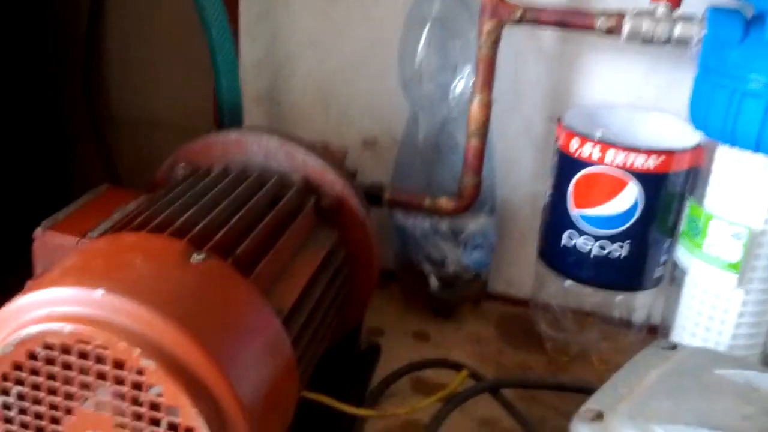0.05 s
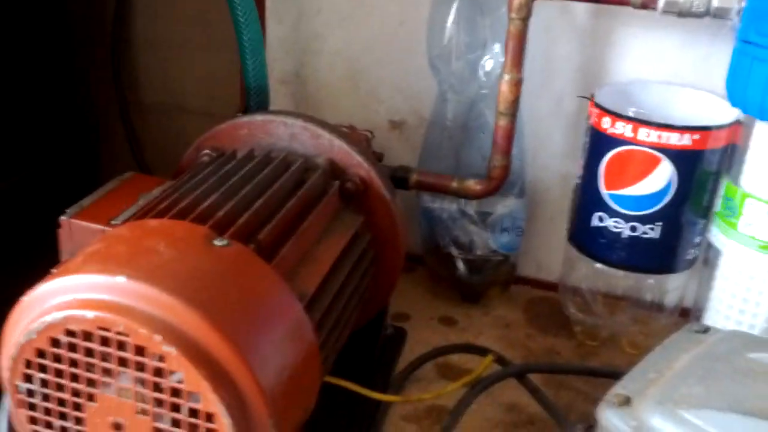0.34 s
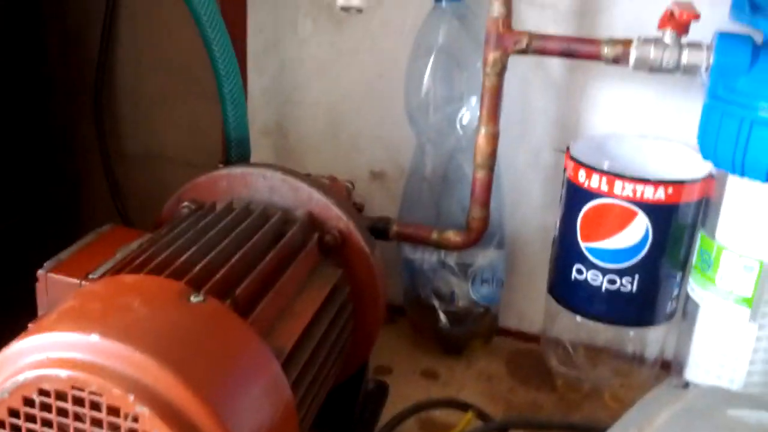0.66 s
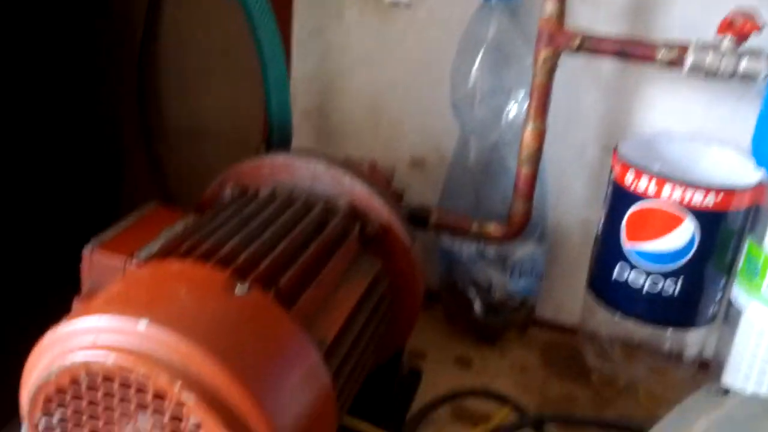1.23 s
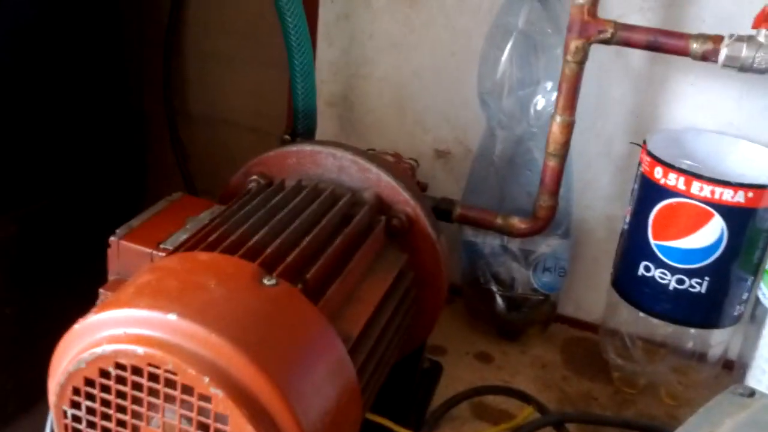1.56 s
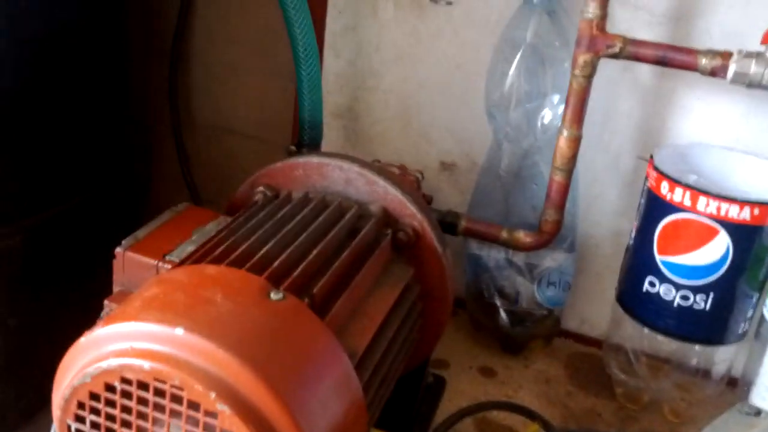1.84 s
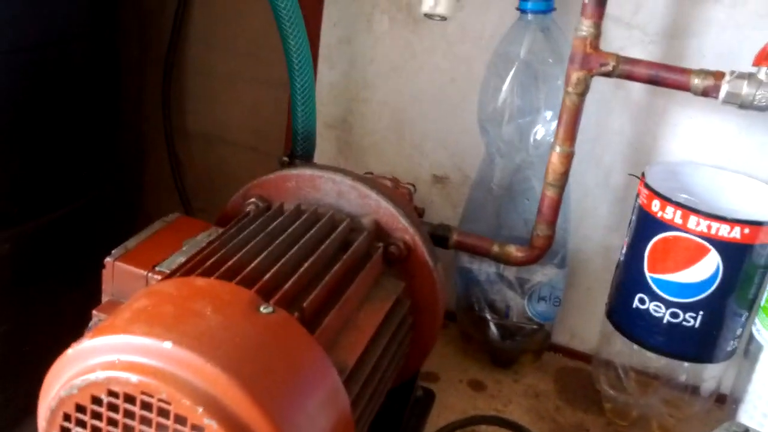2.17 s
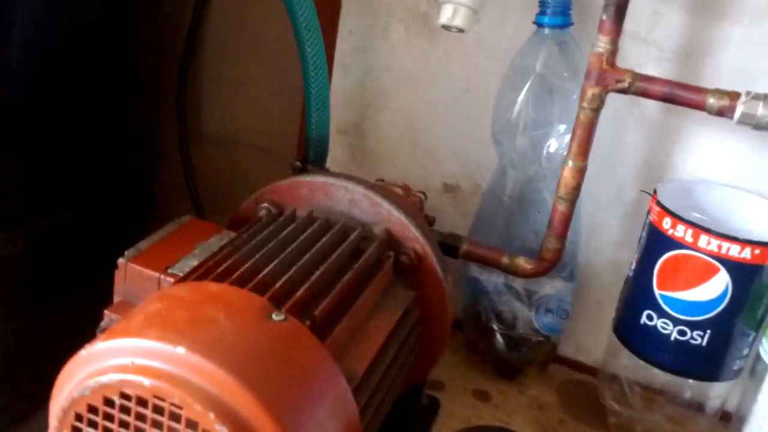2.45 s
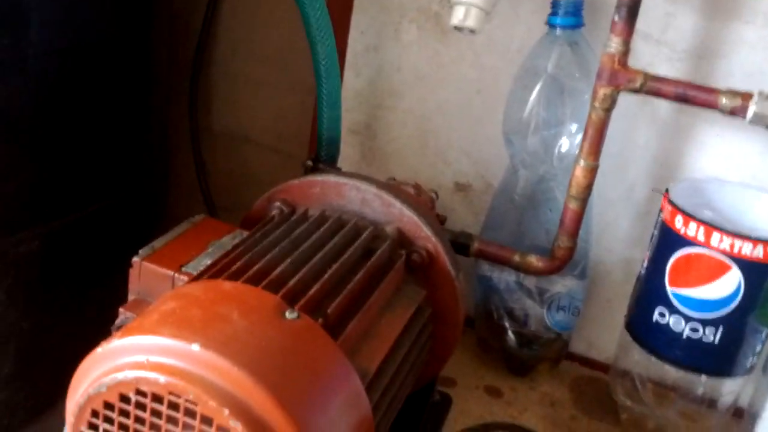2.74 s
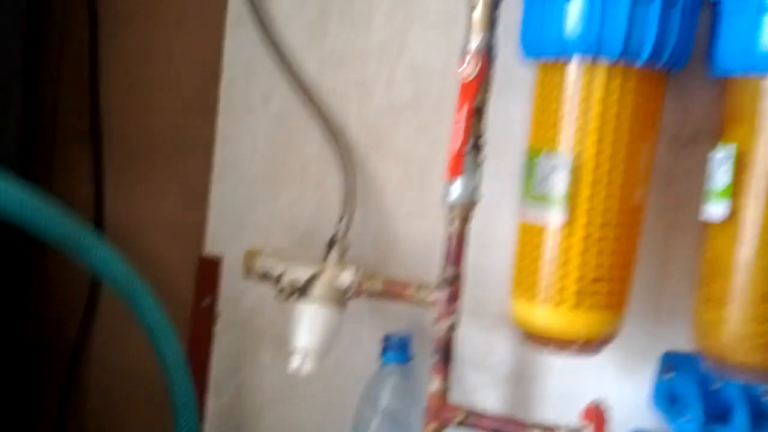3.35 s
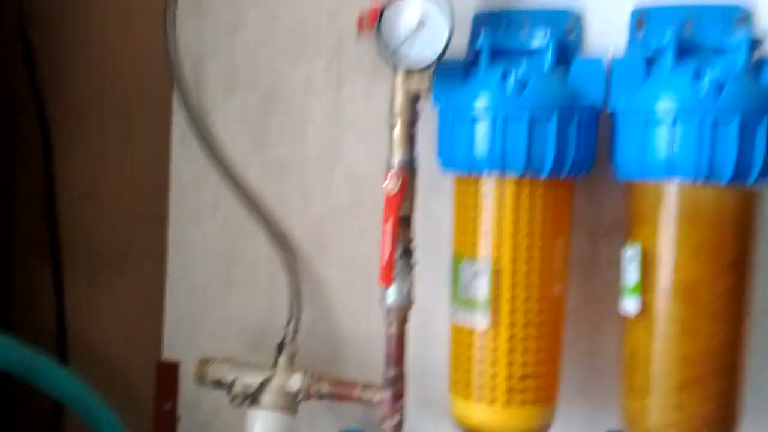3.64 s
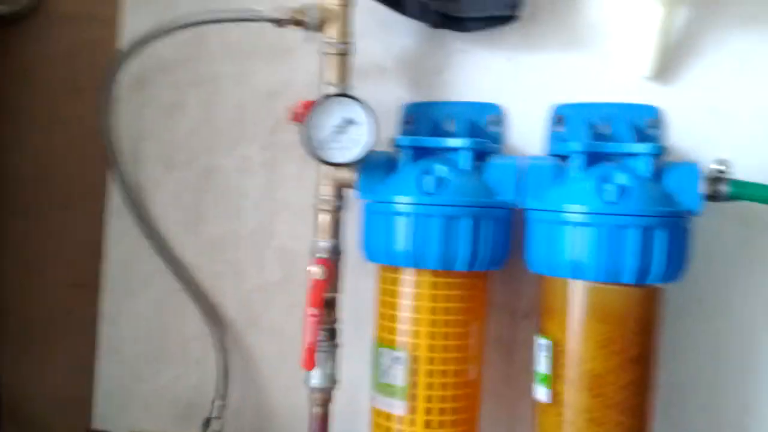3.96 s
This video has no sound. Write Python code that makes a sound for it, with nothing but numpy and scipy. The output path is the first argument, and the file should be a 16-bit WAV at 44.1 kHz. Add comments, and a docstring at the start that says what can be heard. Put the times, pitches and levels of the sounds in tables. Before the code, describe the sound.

An electric motor starts with a clunk and runs with a steady grinding hum.

```python
"""A small utility room, where a four-pole electric motor drives a water pump near a hand-held microphone. After
faint handling knocks, the contactor clicks and the starting torque jolts the frame into ringing. The magnetic
field hums at twice the mains frequency, the pump impeller's vanes whine at multiples of the shaft speed, and
seal and bearing rub once a turn over a steady grinding and hiss. A second after the start the pipework gives a
dull thump; then the microphone turns away and the timbre shifts."""
import sys
import numpy as np
from scipy import signal
from scipy.fft import rfft, irfft
from scipy.io import wavfile
from scipy.ndimage import uniform_filter1d, map_coordinates

SR = 44100
rng = np.random.default_rng(int(sys.argv[2]) if len(sys.argv) > 2 else 0)


def wav_record(signal):
    """Record a signal, one row per channel, as 16-bit PCM in the file named by sys.argv[1]."""
    frames = np.transpose(np.atleast_2d(signal))
    bounded = np.clip(frames, -1, 1)
    # unit amplitude maps onto the largest positive 16-bit level
    quanta = np.round(bounded * 32767).astype(np.int16)
    wavfile.write(sys.argv[1], SR, quanta)


N = 176400
TIME_S, FREQ_HZ = np.arange(N) / SR, np.arange(N // 2 + 1) * SR / N
MAINS_HZ, SHAFT_HZ, POWER_ON_S = 50, 24.945, 1.545


def gain(db):
    """Amplitude ratio: tenfold for every 20 dB."""
    return 10 ** (np.asarray(db) / 20)


def noise():
    """White Gaussian noise: equal power at all frequencies."""
    return rng.standard_normal(N)


def colour(x, spectrum):
    """Spectral shaping by (frequency_hz, level_db) points, with steep skirts; rms 1."""
    hz, db = np.array(spectrum).T
    log_f = np.log(np.maximum(FREQ_HZ, 1))
    outside = np.abs(log_f - np.clip(log_f, np.log(hz[0]), np.log(hz[-1])))
    shaped = irfft(rfft(x) * gain(np.interp(log_f, np.log(hz), db) - 220 * outside), N)
    return shaped / np.std(shaped)


def band(x, centre_hz, width_hz):
    """Resonance with a Lorentzian amplitude response; rms 1."""
    shaped = irfft(rfft(x) / (1 + (2 * (FREQ_HZ - centre_hz) / width_hz) ** 2), N)
    return shaped / np.std(shaped)


def drift(rate_hz):
    """Smoothed random fluctuation with a spread near 1."""
    hold = int(SR / rate_hz)
    steps = np.repeat(rng.standard_normal(N // hold + 1), hold)
    return 1.44 * uniform_filter1d(uniform_filter1d(steps, hold), hold)[:N]


def burst(age, attack_s, decay_s, hold_s=0):
    """Transient envelope: linear rise, optional hold, exponential decay."""
    return np.clip(age / attack_s, 0, 1) * np.exp(-np.maximum(age - attack_s - hold_s, 0) / decay_s)


def ring(start_s, modes, contact_s):
    """Free vibration: damped modes build up over the contact time of a blow."""
    age = np.maximum(TIME_S - start_s, 0)
    ringing = sum(gain(db - 60 * age / t60) * np.sin(2 * np.pi * hz * age) for hz, db, t60 in modes)
    return np.minimum(age / contact_s, 1) * ringing


def reverberate(x, t60_s=.45, tail_db=-8):
    """Reverberation: reflections from bare walls add a diffuse, decaying tail."""
    t = TIME_S[:SR // 2]
    tail = rng.standard_normal(len(t)) * gain(-60 * t / t60_s) * (t > .005)
    return x + gain(tail_db) * signal.fftconvolve(x, tail / np.linalg.norm(tail))[:N]


# Ambient noise spectrum: frequency_hz, relative_db
AMBIENT_SPECTRUM = [(12, -37), (20, 3), (66, -14.5), (153, -16.5), (232, -11.5), (633, -21), (1780, -23),
                    (2410, -22), (2700, -24), (3460, -23.5), (3770, -21.5), (4580, -23.5), (12100, -22),
                    (13600, -17), (15600, -13)]
# Electrical buzz bands: centre_hz, width_hz, level_db
BUZZ_BANDS = [(2383, 550, -63.5), (6480, 58, -74), (11100, 770, -69), (13750, 950, -59.5)]

def background():
    """Amplitude modulation at the mains frequency pulses a flickering buzz, over rumble and hiss."""
    pulse = burst(TIME_S % (1 / MAINS_HZ), .0016, .015) + .8
    periodic = np.resize(rng.standard_normal(SR // MAINS_HZ), N)
    buzz = sum(gain(db + drift(69.8)) * band((periodic + noise()) * pulse, hz, width)
               for hz, width, db in BUZZ_BANDS)
    ambient = gain(-57.5) * colour(noise(), AMBIENT_SPECTRUM)
    rumble = gain(-56) * band(noise(), 44, 60)
    return buzz + ambient + rumble


# Handling knocks: start_s, thud_db, tick_db
KNOCKS = [(.029, -45, -52), (.072, -62, -52), (.259, -46, -47), (.267, -56, -57), (.443, -66, -48)]
# Spectra of a knock's thud and tick: frequency_hz, relative_db
THUD_SPECTRUM = [(150, -7), (350, 4.5), (500, -1), (650, 6), (850, -9), (1100, -18), (1600, -14),
                 (3000, -21)]
TICK_SPECTRUM = [(900, -17), (1400, 3), (2500, -5), (5000, -10), (9000, -5), (15000, 1)]
# Brushes of the hand: start_s, centre_hz, level_db, decay_s
BRUSHES = [(.005, 5000, -61.5, 0.13), (.25, 6460, -65, 0.22), (.28, 108, -59, 0.3),
           (.485, 300, -55.5, 0.06), (.63, 6000, -58.5, 0.068), (1.135, 2850, -62, 0.13)]

def handling():
    """Structure-borne sound: the hand knocks and brushes faintly on the microphone."""
    thuds = sum(gain(db) * burst(TIME_S - at, .0017, .032) for at, db, _ in KNOCKS)
    ticks = sum(gain(db) * burst(TIME_S - at, .003, .0072) for at, _, db in KNOCKS)
    brushes = sum(gain(db) * burst(TIME_S - at, .0062, decay) * band(noise(), hz, .5 * hz)
                  for at, hz, db, decay in BRUSHES)
    return thuds * colour(noise(), THUD_SPECTRUM) + ticks * colour(noise(), TICK_SPECTRUM) + brushes


# Blows at switch-on: start_s, ring_db, rattle_db
BLOWS = [(1.508, -54.5, -58), (1.533, -31, -44), (1.545, -23, -25), (1.556, -27, -25),
         (1.5618, -8.5, -21.5), (1.5727, -13.5, -34)]
# Modes of the frame and pipework: pitch_hz, relative_db, t60_s
FRAME_MODES = [(162.5, -16, 0.64), (229, -7, 0.17), (338, -22, 0.26), (428.2, -6.5, 0.23), (568, -8, 0.1),
               (624, -1.5, 0.039), (671, -9, 0.073), (780, -14, 0.17), (896, -4.5, 0.15), (1510, -13, .12),
               (1823, -19.5, 0.14)]
# Spectra of the rattle and the mounting's shudder: frequency_hz, relative_db
RATTLE_SPECTRUM = [(150, 6), (250, 4), (700, 2.5), (1000, 6), (1250, -37), (1600, -5), (3500, -6),
                   (5000, -14), (9000, -18), (15000, -25)]
SHUDDER_SPECTRUM = [(25, -8), (60, -15), (110, -10), (165, -1), (188, -12), (235, -10), (350, -6),
                    (500, -28), (900, -18)]

def starting_jolt():
    """Impulse excitation: the contactor's clicks and the starting torque ring and rattle the frame and shake
    its mounting."""
    ringing = sum(gain(db) * ring(at, FRAME_MODES, contact_s=.0011) for at, db, _ in BLOWS)
    ringing = signal.sosfilt(signal.butter(2, 110, "high", fs=SR, output="sos"), ringing)
    rattle = sum(gain(db) * burst(TIME_S - at, .00084, .016) for at, _, db in BLOWS)
    rattle *= colour(noise(), RATTLE_SPECTRUM)
    shudder = gain(-29.5) * burst(TIME_S - POWER_ON_S, .053, .14) * colour(noise(), SHUDDER_SPECTRUM)
    return reverberate(ringing + rattle) + shudder


# Hum orders (of the mains) and whine orders (of the shaft: 36 impeller vanes, sidebands, harmonics)
HUM_ORDERS, WHINE_ORDERS = (2, 12, 14), (35, 36, 37, 72, 108, 144)
# Tone levels along the microphone's path through standing waves: time_s, 3 x hum_db, 6 x whine_db
TONE_LEVELS = [(1.8, -38.5, -53, -58, -51, -48, -44, -54, -41, -50),
               (2.05, -36, -47, -57, -53, -42, -43, -56, -43, -51),
               (2.35, -36, -49, -57, -62, -37.5, -45, -55, -43, -50),
               (2.6, -34, -47, -47, -54, -39, -51, -51, -48, -46),
               (2.8, -32.5, -48, -47, -58, -35.5, -47, -50, -45, -45),
               (3.05, -33.5, -53, -48, -66, -41, -43, -46, -44, -44),
               (3.3, -32.5, -55, -48, -54, -47, -38, -53, -46, -43.5),
               (3.6, -34, -63, -60, -48, -45, -43, -69, -45, -47),
               (3.9, -33.5, -52, -51, -44, -42, -47, -75, -49, -53)]

def hum_and_whine(turns, throb_peak_s=3.652):
    """Magnetic forces hum; the vane-passing whine beats with its sidebands once a turn."""
    times, *levels = np.array(TONE_LEVELS).T
    rotor = turns - np.interp(throb_peak_s, TIME_S, turns)
    hum = [order * MAINS_HZ * TIME_S + rng.random() for order in HUM_ORDERS]
    whine = [order * rotor for order in WHINE_ORDERS]
    return sum(np.sqrt(2) * gain(np.interp(TIME_S, times, db) + .5 * drift(10)) * np.cos(2 * np.pi * c)
               for c, db in zip(hum + whine, levels))


# Weaker shaft harmonics at three microphone positions: order, first_db, second_db, third_db
SHAFT_HARMONICS = [(9, -52, -47, -44), (11, -56, -50, -51), (16, -56, -52, -53), (63, -56, -53, -53),
                   (73, -53, -54, -62), (80, -57, -64, -50), (81, -59, -58, -44.5), (99, -52, -52, -56),
                   (116, -50, -52, -56), (117, -48, -53, -56), (134, -51, -48, -65), (136, -54, -52, -53),
                   (140, -51, -53, -69), (143, -47, -51, -58), (162, -50, -53, -62), (163, -50, -52, -58),
                   (164, -51, -55, -60), (236, -55, -58, -65), (252, -56, -58, -65), (392, -56, -58, -58)]

def shaft_harmonics(turns, position_times_s=(2.1, 2.95, 3.75)):
    """Harmonic series of the rotation, each partial wavering in level on its own."""
    return sum(np.sqrt(2) * gain(np.interp(TIME_S, position_times_s, levels) + 2 * drift(1.98))
               * np.sin(2 * np.pi * (order * turns + rng.random())) for order, *levels in SHAFT_HARMONICS)


def roughness(turns, fresh_share, track_count=4):
    """Quasi-periodic noise: a slowly changing surface recurs each turn, mixed with fresh noise."""
    size = int(SR / SHAFT_HZ)
    tracks = rng.standard_normal((track_count, size))
    weights = np.array([drift(.99) for _ in tracks])
    weights /= np.linalg.norm(weights, axis=0)  # constant total power
    recurring = sum(weight * map_coordinates(track, [turns % 1 * size], mode="grid-wrap")
                    for track, weight in zip(tracks, weights))
    return np.sqrt(1 - fresh_share) * recurring + np.sqrt(fresh_share) * noise()


def housing(x, ripple_db, spacing_hz, positions=3):
    """Narrow casing and room resonances ripple the spectrum, differently as the microphone moves."""
    spectrum, out = rfft(x), np.zeros(N)
    position = np.interp(TIME_S, [POWER_ON_S, N / SR], [0, positions - 1])
    for k in range(positions):
        ripple = np.interp(FREQ_HZ / spacing_hz, np.arange(2048), rng.standard_normal(2048))
        nearness = np.maximum(1 - np.abs(position - k), 0)
        out += nearness * irfft(spectrum * gain(ripple_db * np.clip(ripple, -2, 2)), N)
    return out


def turned_away(midpoint_s=3.21, length_s=.82):
    """Orientation of the microphone: 0 facing the motor, 1 turned away."""
    return np.clip((TIME_S - midpoint_s) / length_s + .5, 0, 1)


def directional(x, facing, facing_db, away, away_db):
    """Directivity: one spectrum fades into another as the microphone turns."""
    share = turned_away()
    return (1 - share) * gain(facing_db) * colour(x, facing) + share * gain(away_db) * colour(x, away)


# Pump body spectra, facing and turned away: frequency_hz, relative_db
BODY_FACING = [(76, -45), (130, -10), (172, -13.5), (232, -4.5), (446, -15), (601, -12), (758, -21),
               (901, -5.5), (1000, -15), (1300, -17.5), (1690, -31)]
BODY_AWAY = [(76, -45), (130, -8), (174, -21), (227, 1), (344, -8.5), (695, -15.5), (751, -22), (893, -6.5),
             (1020, -21.5), (1300, -12.5), (1690, -52)]

def pump_body(turns):
    """Forced vibration: roughness drives the low resonances of the pump body."""
    return directional(roughness(turns, fresh_share=.65), BODY_FACING, -41, BODY_AWAY, -40.5)


def rub(turns, closes_s, attack_s, hold_s, decay_s):
    """Envelope of a periodic contact that closes once a turn, phased to do so at closes_s."""
    age = (turns - np.interp(closes_s, TIME_S, turns)) % 1 / SHAFT_HZ
    return burst(age, attack_s, decay_s, hold_s)


# Grinding spectra, facing and turned away: frequency_hz, relative_db
GRIND_FACING = [(710, -9), (1200, -7.5), (1540, 1.5), (1670, -3.5), (1790, -3), (2340, -4.5), (2630, 0.5),
                (2830, -4), (3470, -2.5), (3760, -7.5), (4150, 2), (4660, -11), (5200, -15.5), (6760, -13)]
GRIND_AWAY = [(710, -32), (1200, -15), (1460, 0), (2000, -4.5), (2620, -2.5), (2830, -4), (3490, -5.5),
              (3760, -9.5), (4140, -3), (5200, -23)]

def grinding(turns, seal_contact):
    """Roughness noise in the midrange, modulated by the seal as the microphone turns away."""
    grind = housing(roughness(turns, fresh_share=.33), ripple_db=1.5, spacing_hz=28)
    grind *= 1 + .3 * seal_contact * turned_away()
    return directional(grind, GRIND_FACING, -34, GRIND_AWAY, -37)


# Hiss spectra, facing and turned away: frequency_hz, relative_db
HISS_FACING = [(2940, -30), (5000, -4), (5140, -15.5), (5450, 3.5), (5800, -1), (6720, -7.5), (8440, -2),
               (10200, -4), (14700, -6), (15600, -11)]
HISS_AWAY = [(4900, -6), (5900, -4.5), (9500, -1), (15500, -8)]

def hissing(turns, bearing_contact):
    """Roughness noise in the treble, modulated by the bearing's rub."""
    hiss = housing(roughness(turns, fresh_share=.25), ripple_db=3, spacing_hz=35)
    hiss *= 1 + .25 * bearing_contact
    return directional(hiss, HISS_FACING, -40.5, HISS_AWAY, -41)


def bearing_scrape(turns, contact):
    """Sliding friction in the bearing excites one broad resonance."""
    return gain(-35) * contact * band(roughness(turns, fresh_share=.25), centre_hz=3350, width_hz=1540)


# Spectrum of the seal's rasp: frequency_hz, relative_db
RASP_SPECTRUM = [(4700, -29), (5700, -0.5), (6900, -6), (8400, 3.5), (10000, 3.5), (12500, -2),
                 (15500, -17)]

def seal_rasp(turns, contact):
    """Sliding friction: the seal rasps over nearly the same roughness on every turn."""
    rasp = housing(roughness(turns, fresh_share=.06), ripple_db=4.5, spacing_hz=39)
    return gain(-34.5 + drift(10)) * contact * colour(rasp, RASP_SPECTRUM)


# Level offsets as the microphone moves: time_s, grind_db, hiss_db, rasp_db
NOISE_OFFSETS = [(1.55, -1, 1.5, -1.5), (2.76, -2.5, -1.5, -3), (3.17, -0.5, -0.5, -1),
                 (3.38, -2.5, -1.5, -1.5), (3.62, -2.5, -1.5, 0.5), (4.0, -2.5, -2.5, -4.5)]

def motor(spin_up_s=.011, rise_s=.015, sag_hz_per_s=.012):
    """Rotating machinery: one shaft angle keeps whine, roughness and rubs in step."""
    age = np.maximum(TIME_S - POWER_ON_S, 0)
    speed_hz = (SHAFT_HZ - sag_hz_per_s * age) * (1 - np.exp(-age / spin_up_s))
    turns = np.cumsum(speed_hz * (1 + .0001 * drift(6))) / SR
    times, *offsets = np.array(NOISE_OFFSETS).T
    grind_gain, hiss_gain, rasp_gain = (gain(np.interp(TIME_S, times, db)) for db in offsets)
    seal = rub(turns, 2.5075, attack_s=.0005, hold_s=.0052, decay_s=.0038)
    seal += .5 * rub(turns, 2.5075, attack_s=.0003, hold_s=.0005, decay_s=.001)  # tick as it catches
    bearing = rub(turns, 2.532, attack_s=.002, hold_s=.005, decay_s=.002) * (1 - turned_away())
    out = hum_and_whine(turns) + shaft_harmonics(turns) + pump_body(turns)
    out += grind_gain * grinding(turns, seal) + hiss_gain * hissing(turns, bearing)
    out += bearing_scrape(turns, bearing) + rasp_gain * seal_rasp(turns, seal)
    return out * np.minimum(age / rise_s, 1)


# Pipework modes: pitch_hz, relative_db, t60_s
PIPE_MODES = [(121.5, -7.5, 0.21), (148, -14, 0.34), (234, -5.5, 0.15), (323.2, 0.5, 0.14),
              (343, -12.5, 0.37), (406, -13.5, 0.31), (581, -4.5, .09), (621, -13, 0.069),
              (787, -15, 0.097)]

def pipe_thump(start_s=2.5035):
    """Modal decay: one dull knock rings the low modes of the pipework."""
    return reverberate(gain(-14.5) * ring(start_s, PIPE_MODES, contact_s=.0036))


def scene():
    """Superposition of all sources at one microphone."""
    return (background() + handling() + starting_jolt() + motor() + pipe_thump())[None]


def record(dry):
    """Band limiting: a steep elliptic low-pass cuts the treble above 15.6 kHz."""
    return signal.sosfilt(signal.ellip(10, .2, 80, 15600, fs=SR, output="sos"), dry)


dry = scene()
out = record(dry)
wav_record(out)
```